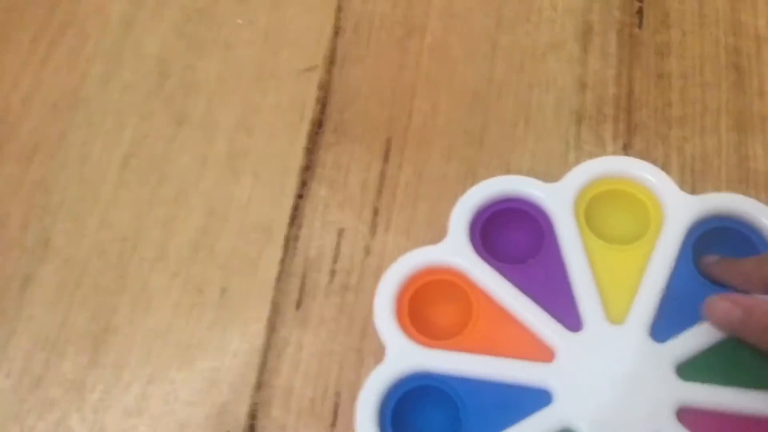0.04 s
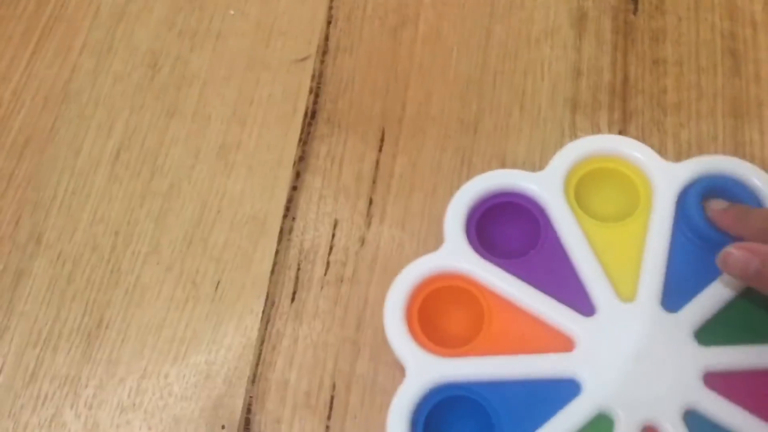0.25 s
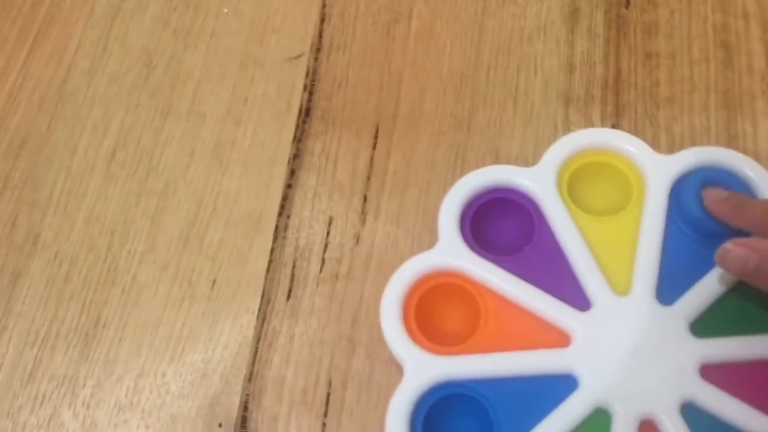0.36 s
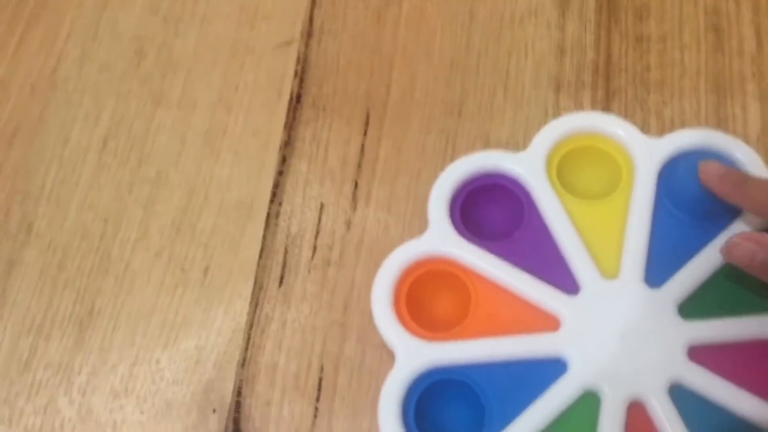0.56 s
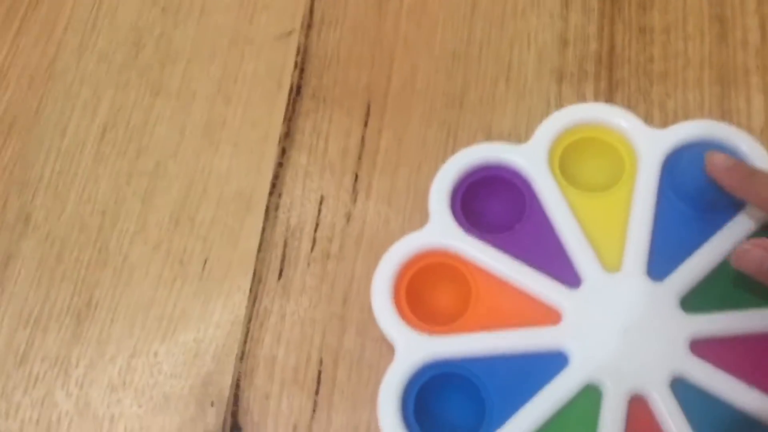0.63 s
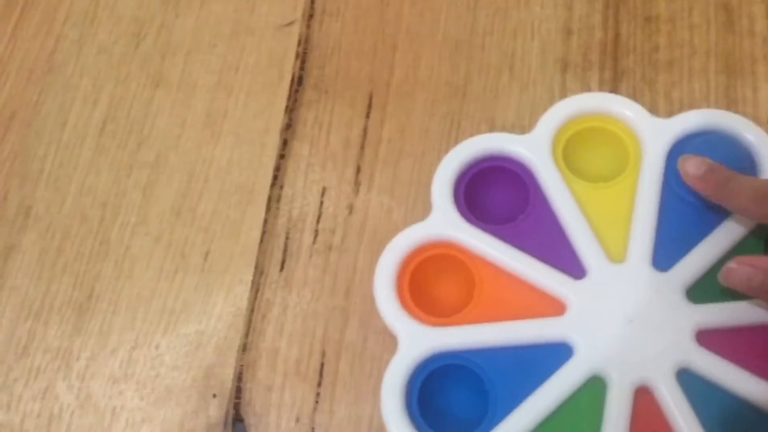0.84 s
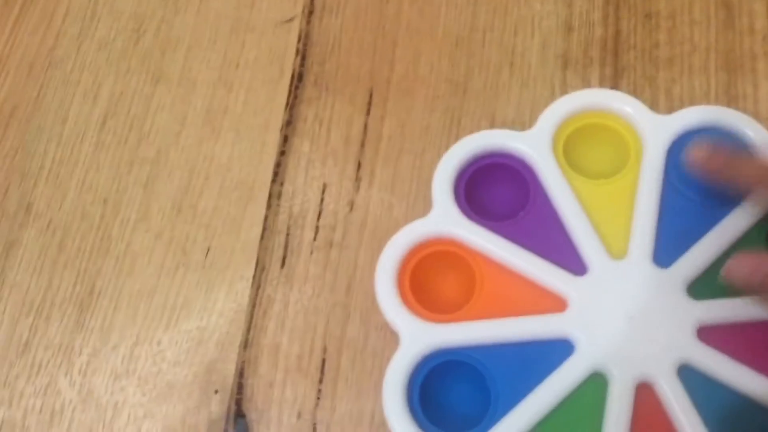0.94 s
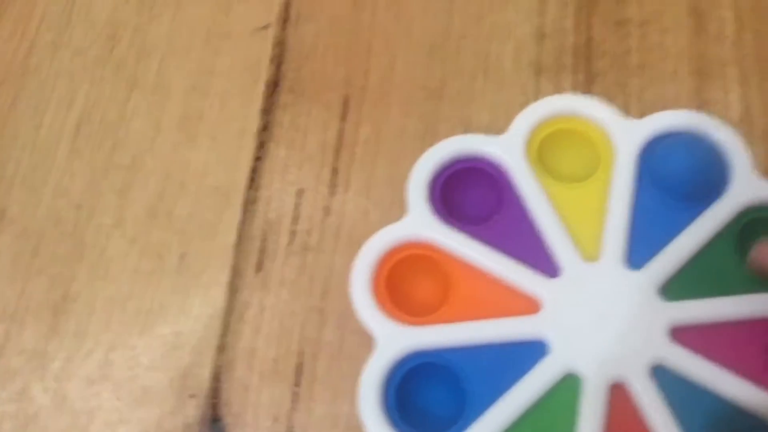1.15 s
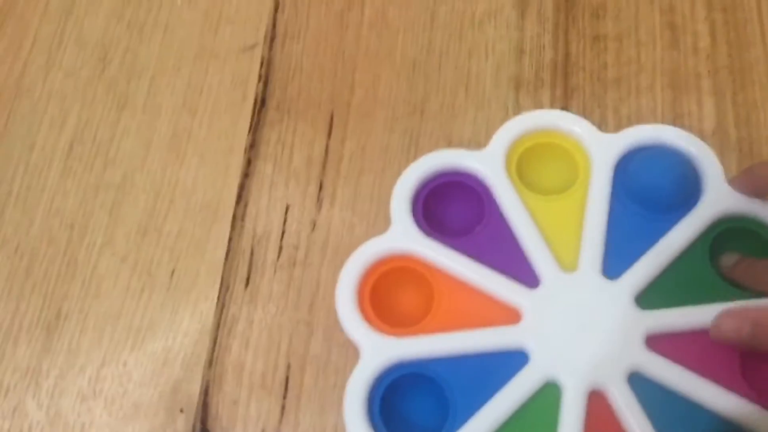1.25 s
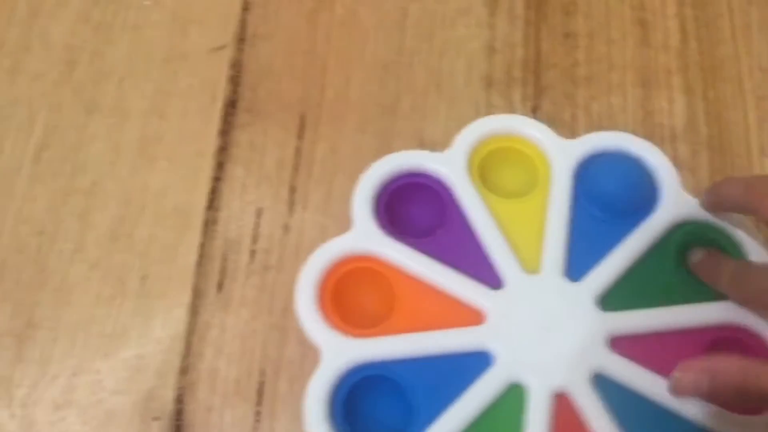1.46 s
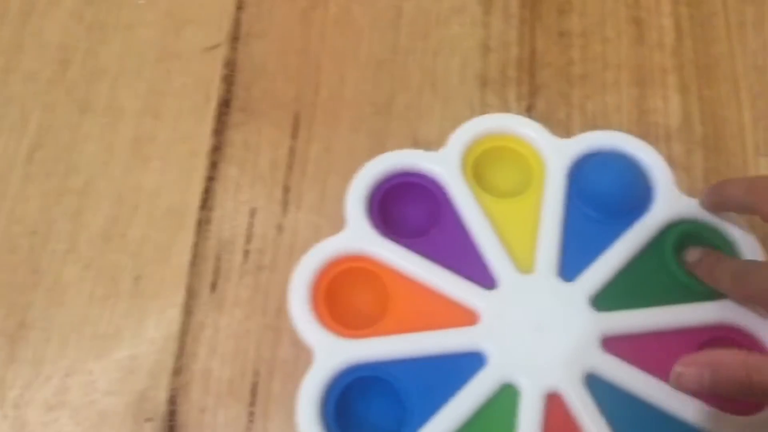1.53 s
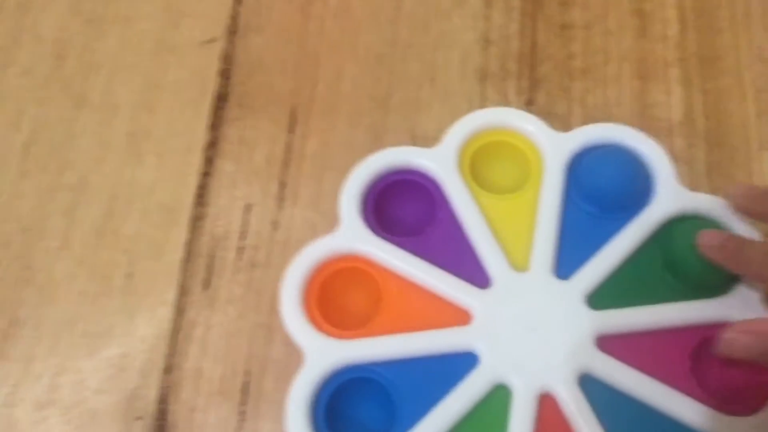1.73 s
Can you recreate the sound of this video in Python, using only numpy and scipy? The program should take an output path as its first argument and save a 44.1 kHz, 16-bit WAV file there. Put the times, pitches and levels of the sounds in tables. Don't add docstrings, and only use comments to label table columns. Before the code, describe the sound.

A silicone push-pop toy played backwards: one loud sucked-in pop, later a cluster of plastic knocks

```python
import sys
import numpy as np
from scipy import signal
from scipy.fft import rfft, irfft
from scipy.io import wavfile
from scipy.ndimage import uniform_filter1d

SR = 44100
rng = np.random.default_rng(int(sys.argv[2]) if len(sys.argv) > 2 else 0)


def wav_out(sig):
    wavfile.write(sys.argv[1], SR, np.round(np.clip(np.atleast_2d(sig).T, -1, 1) * 32767).astype(np.int16))


def undo_db(level):
    steps = np.asarray(level, float) / 20
    return 10 ** steps


N = 79380
M = N + 4410

# (frequency [Hz], level [dB], t60 [s])
FRAME_MODES = [(482, -5, 0.02), (931, 0, 0.02), (1300, -6.5, 0.035), (1489, -0.5, 0.032),
               (2050, -6.5, 0.0099), (2670, -15, 0.01), (2878, -8, 0.03), (3370, -2.5, .02),
               (3760, -10, 0.017), (4040, -13, 0.017), (5000, -14, 0.013)]
# (frequency [Hz], level [dB], t60 [s])
TABLE_MODES = [(58.5, -4.5, 0.13), (87, -5, 0.28), (112.4, -5, 0.12)]
# (frequency [Hz], level [dB], t60 [s])
WOOD_MODES = [(105, -6, 0.052), (229, -6.5, 0.04), (406, -7, 0.066), (735, 2, 0.019), (1295, -9.5, .025),
              (1770, -9.5, 0.016), (2200, -16, 0.0079), (2770, -14, 0.017), (5760, 1.5, 0.0062)]
# (frequency [Hz], level [dB])
GRIT_TONE = [(500, -22), (1500, -6), (3200, 1), (5500, -8.5), (8000, -16.5), (16000, -19)]


def colour(x, table):
    hz = np.maximum(np.arange(len(x) // 2 + 1) * SR / len(x), 1)
    points = np.array(table)
    gain_db = np.interp(np.log(hz), np.log(points[:, 0]), points[:, 1])
    return irfft(rfft(x) * undo_db(gain_db), len(x))


def unit(x):
    return x / np.sqrt(np.mean(x ** 2))


def ring(modes, push_s, shift=1., cycles=0., size=13230):
    longest_build_s = 0.0027
    t = np.arange(size) / SR
    out = 0
    for hz, db, t60 in modes:
        strike, detune = rng.standard_normal(2)
        build_s = push_s + min(cycles / hz, longest_build_s)
        rise = 1 - np.exp(-(t / build_s) ** 1.5)
        decay = undo_db(db + 0.73 * strike - 60 * t / t60)
        out = out + rise * decay * np.sin(2 * np.pi * hz * shift * (1 + 0.0079 * detune) * t + 1.43 * strike)
    return out


def crack(t60, rise_s=1e-5, tone=None):
    # (frequency [Hz], level [dB])
    hard_tone = [(500, -3.5), (2000, -2), (4000, 1), (7000, -6.5), (10000, -4), (14500, -1.5), (18000, 0.5)]
    t = np.arange(4410) / SR
    grit = rng.standard_normal(len(t)) * undo_db(3.5 * rng.standard_normal(len(t)))
    rise = 1 - np.exp(-(t / rise_s) ** 2)
    decay = undo_db(-60 * t / t60) + undo_db(-14.5 - 60 * t / (1.2 * t60))
    return unit(colour(grit, hard_tone if tone is None else tone)) * rise * decay


def add(track, s, x, db):
    i = M - int(round(s * SR))
    track[i:i + len(x)] += undo_db(db) * x[:M - i]


def swells(rows, rough_db, rate):
    t, k = np.arange(N) / SR, int(SR / rate)
    out = 0
    for s, length_s, hz, width_hz, db in rows:
        band = signal.lfilter(*signal.iirpeak(hz, hz / width_hz, SR), rng.standard_normal(N))
        band = signal.lfilter(*signal.iirpeak(hz, hz / min(2 * width_hz, SR / 3), SR), band)
        uneven = unit(uniform_filter1d(uniform_filter1d(rng.standard_normal(N), k), k))
        swell = np.cos(np.pi * np.clip((t - s) / length_s / 1.5, -.5, .5)) ** 2
        out = out + unit(band) * undo_db(db + rough_db * uneven) * swell
    return out


def tail(bands, spread=1.6):
    delay_s = 0.004
    t = np.arange(22050) / SR
    out = 0
    for hz, t60, db in bands:
        wide = spread + hz / 40000
        shape = [(hz / 2, -34), (hz / wide ** 2, -10), (hz / wide ** .5, 0),
                 (hz * wide ** .5, 0), (hz * wide ** 2, -10), (hz * 3, -40)]
        band = unit(colour(rng.standard_normal(len(t)), shape))
        out = out + band * undo_db(db - 60 * t / t60)
    return out * (1 - np.exp(-(t / delay_s) ** 2))


def room(x):
    # (frequency [Hz], t60 [s], level [dB])
    room_bands = [(413, 0.29, -30.5), (1140, 0.18, -26), (2000, 0.18, -25), (3500, .2, -28),
                  (8000, 0.34, -19.5), (14000, .2, -21.5)]
    # (delay [s], level [dB])
    echoes = [(.015, -22)]
    answer = tail(room_bands) * undo_db(-26.0)
    for s, db in echoes:
        answer[int(s * SR)] += undo_db(db)
    return x + signal.fftconvolve(x, answer)[:M]


def room_hiss():
    # (frequency [Hz], density [dB per Hz])
    hiss_tone = [(15, -42.5), (25, 1.5), (59, -3.5), (242, -13), (317, -14.5), (516, -19), (734, -18.5),
                 (863, -20.5), (16000, -27)]
    noise = colour(rng.standard_normal(N), [(10, -20.5)] + list(hiss_tone))
    return unit(noise) * undo_db(-67)


def far_creaks():
    # (time [s], length [s], frequency [Hz], width [Hz], level [dB])
    creaks = [
        (0.74, 0.19, 3620, 240, -69),
        (0.75, 0.15, 2900, 140, -75),
        (0.871, 0.11, 2620, 490, -72.5),
        (0.586, 0.2, 3190, 220, -79.5),
        (0.51, 0.34, 462, 12, -78),
    ]
    return swells(creaks, rough_db=1.2, rate=50)


def finger_rubs():
    # (time [s], length [s], frequency [Hz], width [Hz], level [dB])
    rubs = [(.097, 0.039, 7200, 1100, -61.5), (.1, 0.072, 3500, 2000, -66.5),
            (.1, 0.089, 11900, 4020, -67.5), (.03, 0.12, 8600, 12800, -72), (.58, 0.36, 860, 1300, -72),
            (.58, 0.34, 6830, 12100, -72.5), (1.32, 0.058, 13390, 5000, -67),
            (1.47, 0.35, 1300, 684, -68.5), (1.79, 0.079, 2270, 2000, -64), (1.09, 0.095, 490, 699, -76),
            (1.58, 0.081, 13100, 6000, -64.5)]
    return swells(rubs, rough_db=3.5, rate=117)


def skin_drags():
    # (time [s], length [s], frequency [Hz], width [Hz], level [dB])
    drags = [(.113, .025, 8100, 1400, -67.5), (0.101, 0.038, 2370, 1500, -63.5),
             (1.765, .04, 2080, 460, -67), (1.775, .04, 2800, 420, -66), (1.79, 0.034, 4400, 1500, -72),
             (.14, .14, 460, 120, -74), (.055, .03, 2500, 900, -68), (.21, .04, 1170, 150, -52),
             (.168, .035, 1900, 700, -63), (1.42, .025, 1300, 700, -62), (1.535, .04, 3100, 1200, -60),
             (.259, .012, 1500, 2000, -50)]
    return swells(drags, rough_db=3, rate=160)


def table_hum():
    # (time [s], level [dB], t60 [s])
    nudges = [
        (.35, -57.5, 0.28),
        (0.543, -58.5, 0.35),
        (0.938, -60, 0.38),
        (1.790, -38, 0.19),
    ]
    hum_hz = 157
    wood = np.zeros(M)
    for s, db, t60 in nudges:
        add(wood, s, ring([(hum_hz, 0, t60), (2 * hum_hz, -22, .2)], push_s=0.0202), db)
    return wood


def finger_brushes():
    # (time [s], level [dB], pitch factor)
    brushes = [(.497, -65, 1.2), (.565, -65.5, 1.3), (.605, -70, 1.4), (.644, -62, 1.05),
               (.689, -57.5, 1.43), (.698, -63, .8)]
    air = np.zeros(M)
    for s, db, pitch in brushes:
        add(air, s, ring(WOOD_MODES[2:], 0.0013, pitch), db)
    return air


def finger_taps():
    # (time [s], level [dB])
    ticks = [(.499, -59), (0.564, -59.5), (.610, -59), (.626, -52), (0.662, -62), (.689, -56.5),
             (1.654, -63.5)]
    tap_s = 1.115
    air = np.zeros(M)
    add(air, tap_s, ring(WOOD_MODES, push_s=0.00054), -42.5)
    add(air, tap_s, crack(t60=0.0075), -46)
    for s, db in ticks:
        add(air, s, crack(t60=0.015), db)
    return air


def frame_grit():
    # (time [s], level [dB], t60 [s])
    grits = [(1.4135, -54, 0.015), (1.487, -54, 0.041), (1.539, -52, 0.057), (1.5505, -39, 0.02),
             (1.564, -50, 0.029), (1.576, -39.5, 0.015), (1.599, -47, 0.029)]
    air = np.zeros(M)
    for s, db, t60 in grits:
        add(air, s, crack(t60, 0.002, GRIT_TONE), db)
    return air


def frame_rattle():
    # (time [s], ring [dB], table thud [dB], pitch factor)
    rocks = [(1.303, -56.5, -56.5, 1.8), (1.416, -51.5, -52, 0.9), (1.428, -49.5, -89, .95),
             (1.476, -52, -52, 0.65), (1.49, -37, -53, .9), (1.506, -65, -50.5, 0.75),
             (1.52, -62, -66, 1.02), (1.54, -37.5, -62, 0.83), (1.5513, -28, -43, 1.02),
             (1.562, -48, -58, 1.1)]
    # (time [s], ring [dB], crack [dB], table thud [dB], pitch factor)
    knocks = [(1.413, -53, -58.5, -67.5, 1.046), (1.576, -38, -50.5, -72, 0.92),
              (1.581, -38, -36.5, -42.5, 0.69), (1.5906, -45, -35, -59, 0.85),
              (1.5934, -47, -43, -54, 0.79), (1.6085, -39, -38.5, -50.5, .55),
              (1.610, -33.5, -34, -47.5, 1.1)]
    air, wood = np.zeros(M), np.zeros(M)
    for s, ring_db, thud_db, pitch in rocks:
        add(air, s, ring(FRAME_MODES, 0.0031, pitch), ring_db - 1.5)
        add(wood, s, ring(TABLE_MODES, push_s=0.004), thud_db)
    for s, ring_db, crack_db, thud_db, pitch in knocks:
        add(air, s, ring(FRAME_MODES, 0.0013, pitch), ring_db - 6.0)
        add(air, s, crack(t60=0.015), crack_db)
        add(wood, s, ring(TABLE_MODES, push_s=0.004), thud_db)
    return air, wood


def silicone_creases():
    # (time [s], level [dB], rise [s])
    creases = [
        (.2630, -25, 0.0012),
        (1.328, -49, 0.0013),
        (1.364, -40.5, 0.0022),
        (1.5514, -51, 0.0012),
    ]
    air = np.zeros(M)
    for s, db, rise_s in creases:
        add(air, s, crack(0.018, rise_s), db)
    return air


def pitched_clicks():
    # (time [s], frequency [Hz], level [dB], t60 [s])
    pings = [(.2354, 6500, -31, .007), (.2354, 13200, -36, .009), (.2352, 1000, -34, 0.015),
             (.2498, 14600, -24, .016), (.2502, 5300, -19, .009), (.2500, 9000, -28, .01),
             (.2497, 2930, -21.5, .012), (.2490, 10600, -28, 0.013), (.2624, 13500, -34, .008),
             (.2622, 2500, -32, .01), (1.5758, 3500, -34, .005), (1.5785, 1020, -41, .006),
             (1.5810, 15000, -38, .01), (1.5905, 13200, -26, .004), (1.5906, 9700, -29, 0.0066),
             (1.5931, 8500, -28, 0.0042), (1.5931, 9900, -31, 0.0047), (1.6100, 14600, -33, 0.018),
             (1.6102, 3300, -46, .006), (1.535, 1095, -45.5, .02), (1.797, 1180, -58, .07),
             (1.793, 2800, -57, .05), (.2492, 1970, -16, .012), (.2496, 4350, -24, .01),
             (.2352, 4600, -36, .007), (.2622, 900, -34, .012), (1.549, 3300, -38, .012),
             (1.5795, 6200, -42, .006), (1.5905, 3600, -38, .008), (1.364, 4800, -52, .012),
             (1.547, 110, -44, .04), (1.799, 500, -52, .03)]
    air = np.zeros(M)
    for s, hz, db, t60 in pings:
        add(air, s, ring([(hz, 0, t60)], push_s=.0004), db)
    return air


def snap_echoes():
    # (time [s], level [dB], t60 [s])
    slaps = [
        (.176, -65, 0.019),
        (0.1997, -42.5, 0.027),
        (0.2198, -37.5, 0.029),
        (0.2277, -40, 0.022),
    ]
    # (time [s], level [dB], t60 [s])
    sparks = [(.160, -60, .02), (.183, -53, .02), (.2035, -50, .015), (.2125, -50, .012),
              (.2195, -48, .012), (.2235, -46, .012), (.2295, -48, .01)]
    dull, bright = np.zeros(M), np.zeros(M)
    for s, db, t60 in slaps:
        add(dull, s, crack(t60, 0.0018, GRIT_TONE), db)
    for s, db, t60 in sparks:
        add(bright, s, crack(t60, .001), db)
    return dull, bright


def dome_pops():
    # (time [s], ring [dB], room [dB], table thud [dB])
    pop_events = [
        (0.2495, -10.5, -40, -35.5),
        (1.815, -44, -56, -75),
    ]
    # (time [s], level [dB], t60 [s])
    snaps = [(.2352, -46, 0.023), (0.2475, -21, 0.012), (.2488, -21, 0.012), (0.2499, -20, 0.008),
             (1.6206, -59.5, 0.048), (1.799, -73, 0.0088)]
    # (frequency [Hz], level [dB], t60 [s])
    dome_modes = [(279.5, -13, 0.029), (407, -4.5, 0.0198), (862, -1.5, 0.012), (1060, -10, 0.021),
                  (1172, -1, .016), (1586, -4.5, 0.023), (1996, 4, 0.013), (2760, -32.5, 0.004),
                  (3154, -3.5, 0.0044), (3980, -11.5, 0.011), (4178, -17.5, .01), (5400, -21, .008)]
    # (frequency [Hz], t60 [s], level [dB])
    pop_room = [(384, 0.14, -7.5), (790, 0.23, -4), (1170, 0.26, -2), (1980, 0.36, -8), (2650, .35, -10),
                (4400, 0.28, -10), (7500, 0.32, -16), (13500, 0.3, -12)]
    # (frequency [Hz], level [dB], t60 [s])
    frame_after_pop = [(1122, -34, 0.1), (1230, -36.5, .3), (2140, -35, .3), (2930, -46.5, 0.38)]
    # (frequency [Hz], level [dB], t60 [s])
    table_under_pop = [(140.4, -45.5, 0.28), (196, -48, .15)]
    room_gap_s, thud_lag_s = .011, .010
    air, wood = np.zeros(M), np.zeros(M)
    for s, ring_db, room_db, thud_db in pop_events:
        add(air, s, ring(dome_modes, 1e-4, cycles=1.9), ring_db)
        add(air, s - room_gap_s, tail(pop_room, spread=1.05), room_db)
        add(air, s, ring(frame_after_pop, push_s=0.027), ring_db)
        add(wood, s - thud_lag_s, ring(TABLE_MODES, push_s=.008), thud_db)
    for s, db, t60 in snaps:
        add(air, s, crack(t60), db)
    add(wood, pop_events[0][0], ring(table_under_pop, push_s=0.004), 0)
    return air, wood


def scene():
    rattle, rattle_thuds = frame_rattle()
    pop, pop_thuds = dome_pops()
    slaps, sparks = snap_echoes()
    in_room = room(rattle + silicone_creases() + finger_taps() + frame_grit())
    air_highpass = signal.butter(2, 186, "high", fs=SR, output="sos")
    thin = signal.sosfilt(air_highpass, pop + slaps + finger_brushes())
    wood = rattle_thuds + pop_thuds + table_hum()
    backwards = (in_room + thin + wood + pitched_clicks() + sparks)[::-1][:N]
    friction = finger_rubs() + skin_drags() + far_creaks()
    return (backwards + friction + room_hiss())[None]


def band_limit(x):
    return signal.sosfilt(signal.butter(12, 16470, fs=SR, output="sos"), x)


def record(dry):
    bass_cut = signal.butter(2, 25.4, "high", fs=SR, output="sos")
    top_cut = signal.ellip(8, .1, 50, 15900, fs=SR, output="sos")
    x = signal.sosfiltfilt(bass_cut, dry, padtype="even")
    return band_limit(signal.sosfiltfilt(top_cut, x))


dry = scene()
out = record(dry)
wav_out(out)
```